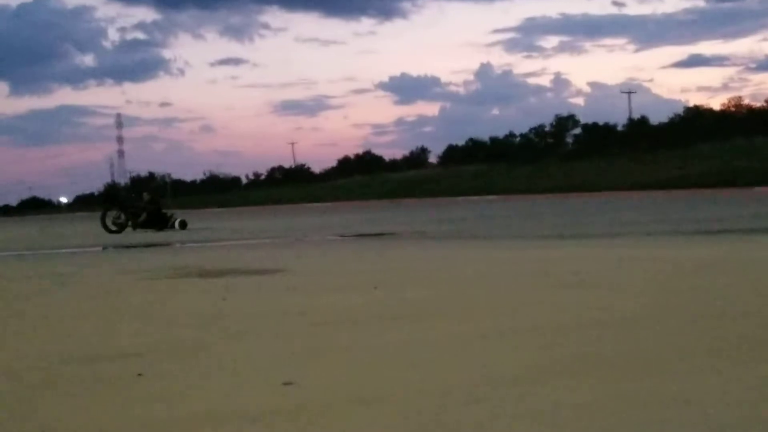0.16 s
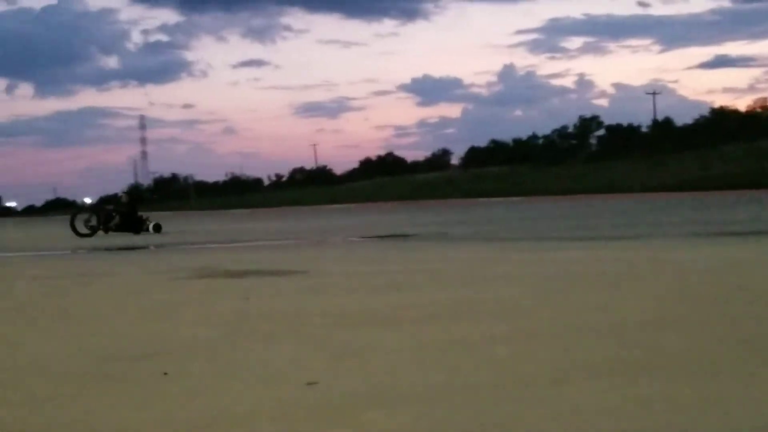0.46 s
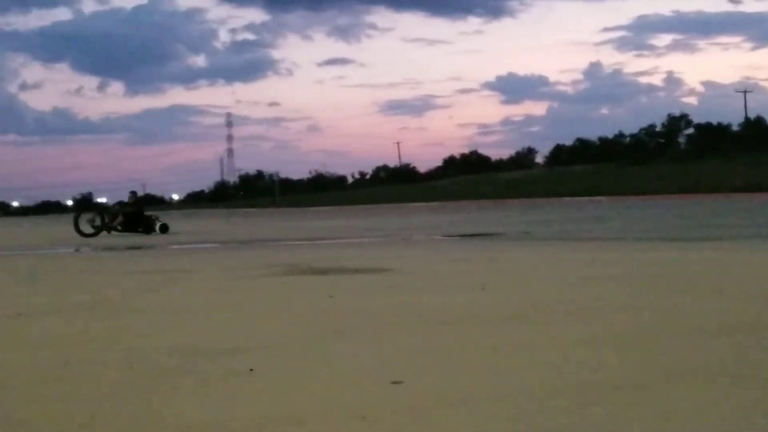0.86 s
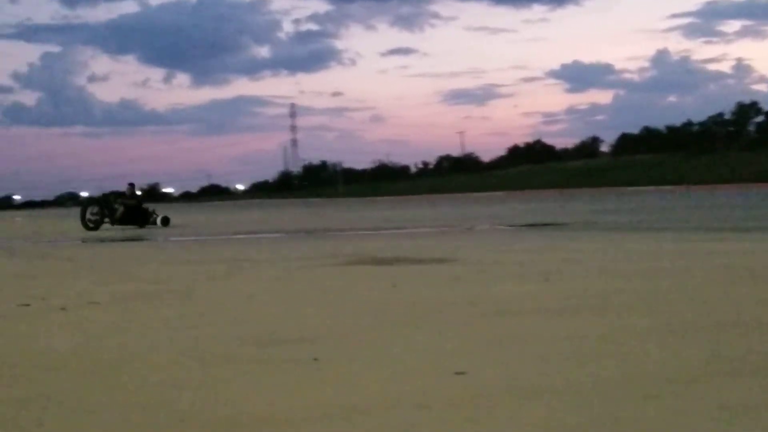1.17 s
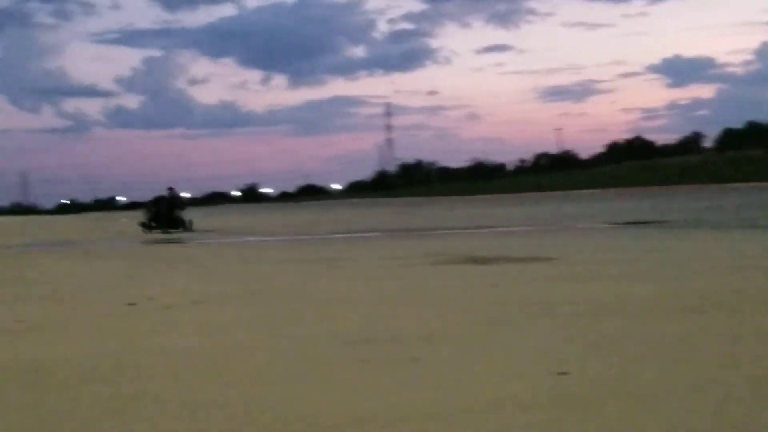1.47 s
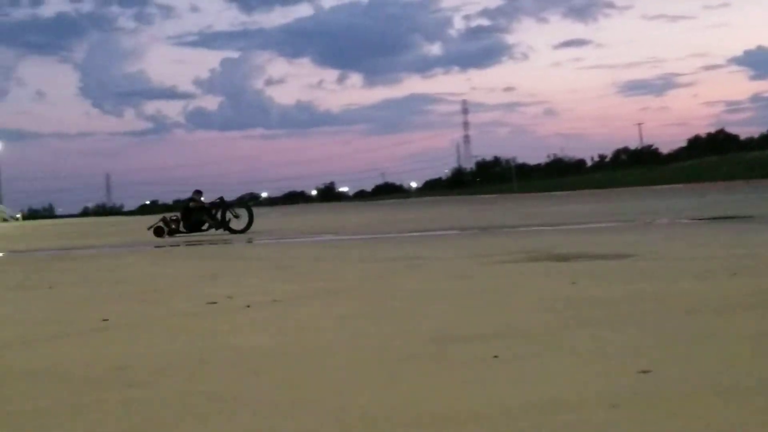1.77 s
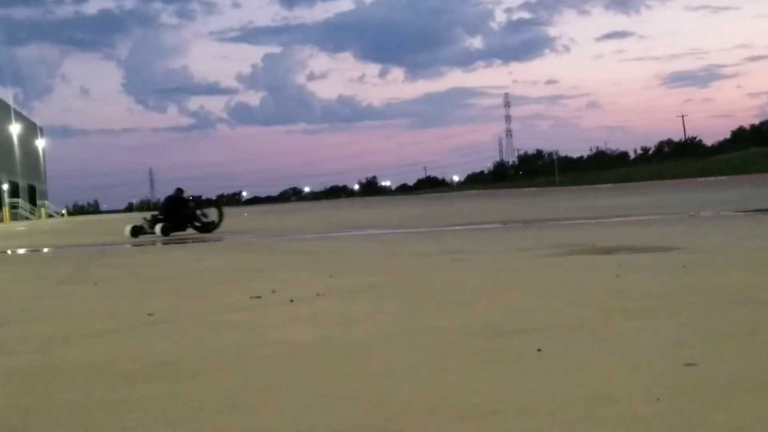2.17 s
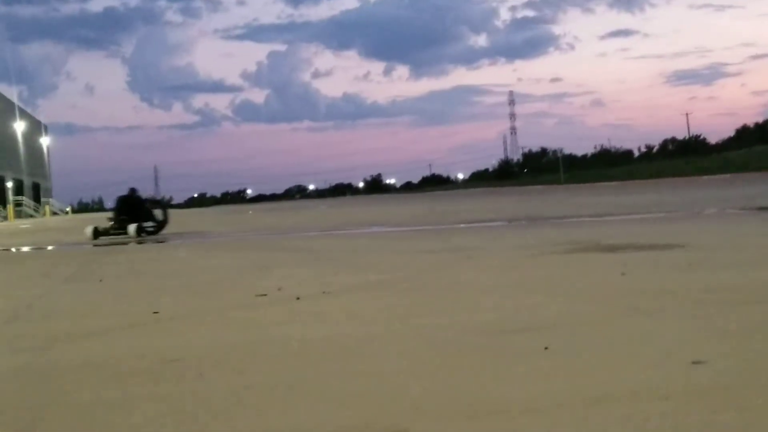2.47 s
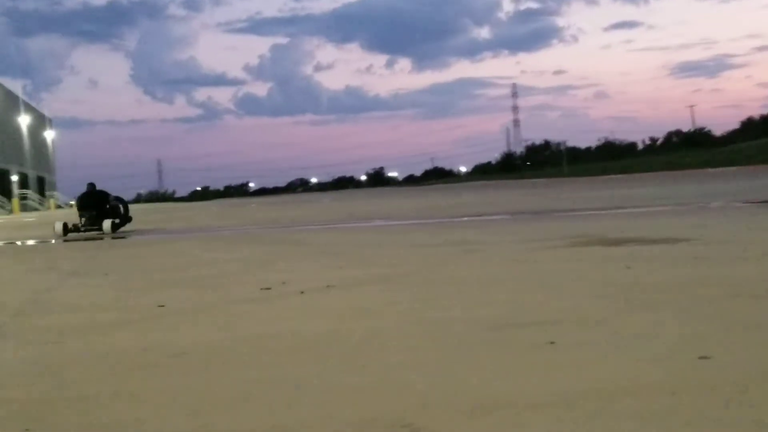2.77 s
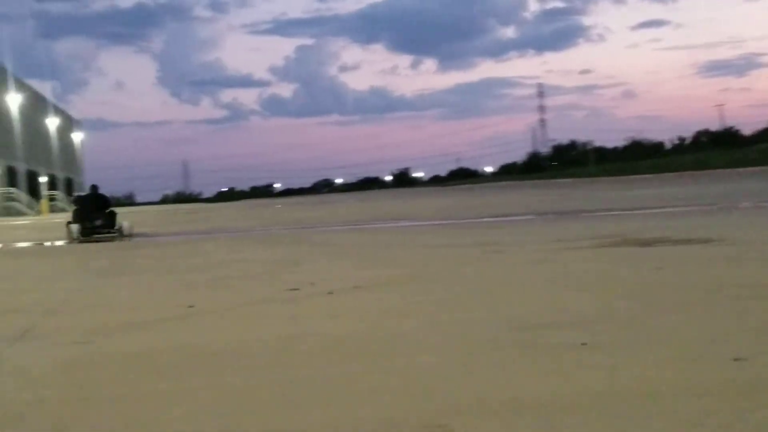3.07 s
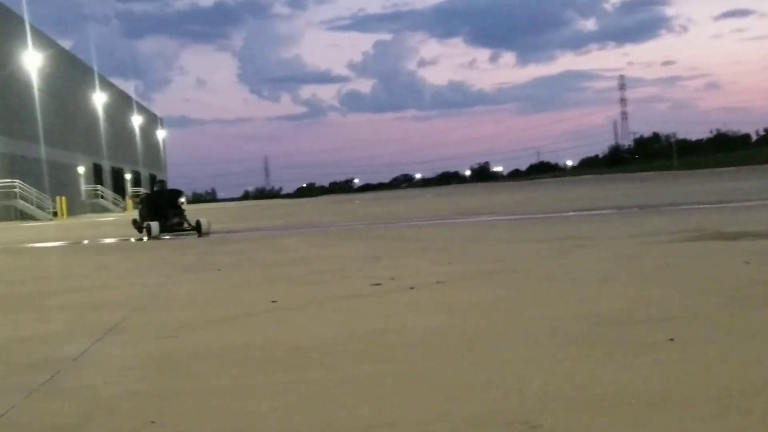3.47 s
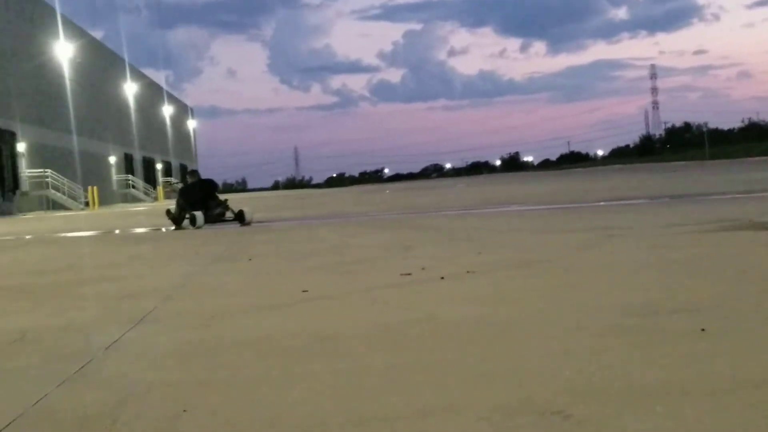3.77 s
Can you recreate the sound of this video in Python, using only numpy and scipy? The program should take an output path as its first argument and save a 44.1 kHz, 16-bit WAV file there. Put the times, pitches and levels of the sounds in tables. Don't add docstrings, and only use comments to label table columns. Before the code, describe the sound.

A small single-cylinder trike engine pulses loudly with sharp double cracks, then its plastic wheels slide with hiss and hollow drumming before it drops to a quiet ticking idle; open concrete lot, faint echo, distant stereo microphone.

```python
import sys
import numpy as np
from scipy import signal
from scipy.fft import rfft, irfft, next_fast_len
from scipy.io import wavfile
from scipy.ndimage import uniform_filter1d

SR = 44100
rng = np.random.default_rng(int(sys.argv[2]) if len(sys.argv) > 2 else 0)


def convert_level_to_amplitude(level_db):
    exponent = np.asarray(level_db, float) / 20
    return 10 ** exponent


def wav_out(sig):
    wavfile.write(sys.argv[1], SR, np.round(np.clip(np.atleast_2d(sig).T, -1, 1) * 32767).astype(np.int16))


N = 172431

# (time [s], effort [dB], silencer can heard [dB],
# outlet aimed at us [dB], valve side aimed at us [dB])
ENGINE = [(0, -16, 1.5, -12.5, -23), (.4, -15.5, -1.5, -12.5, -32), (.65, -16, -2.5, -12, -27),
          (.95, -11.5, -6.5, -16.5, -34), (1.3, -12, -7, -19.5, -12), (1.38, -15, -13, -14, -12),
          (1.45, -12.5, -6, -23, -42), (1.7, -10.5, -9, -21.5, -12), (1.84, -8.5, -6.5, -22, -8),
          (1.92, -21.5, -2.5, -15.5, -8), (2.3, -26, -2.5, -40, -28), (2.55, -20.5, -8, -39, -22),
          (2.86, -19.5, -13, -37, -25), (2.95, -14.5, -16, -36, -15), (3.25, -18.5, -8, -39, -18.5),
          (3.47, -13, -13.5, -33, -12), (3.91, -16.5, -8.5, -37, -8)]
# (time [s], pitch [Hz], heard [dB])
NOTE = [(0, 261, -2), (.1, 261, -2), (.2, 239, 0), (.62, 238, -4), (.82, 234, 0), (.92, 250, -2),
        (1.15, 244, -3), (1.3, 243, 3), (1.365, 246, -10), (1.415, 251, 4), (1.5, 249, -2), (1.56, 240, 0),
        (1.72, 240, 0), (1.83, 268, -4), (2.05, 245, -4), (2.3, 234, -3), (3.2, 240, -1.5), (3.91, 238, 0)]
# (time [s], level [dB])
SKID = [(0, -43.5), (.77, -37.5), (1.28, -35.5), (1.45, -31), (1.61, -29), (1.75, -31), (1.9, -36),
        (2.11, -39), (2.2, -44.5), (2.74, -48), (2.97, -49.5), (3.1, -43), (3.18, -45.5), (3.3, -46),
        (3.64, -53.5), (3.91, -44.5)]


def unit(x):
    return x / np.sqrt(np.mean(x ** 2) + 1e-20)


def along(points, hz):
    f, v = np.transpose(points)
    return np.interp(np.log(hz + 1), np.log(f + 1), v)


def at(rows, s):
    t, *cols = np.transpose(rows)
    return [np.interp(s, t, c) for c in cols]


def filtered(x, response):
    m = next_fast_len(N + SR // 2)
    return irfft(rfft(x, m) * response(np.fft.rfftfreq(m, 1 / SR)), m)[..., :N]


def rush(spectrum, patchy_db):
    # (frequency [Hz], likeness [-1 to 1])
    likeness = [(30, .3), (70, 0.79), (150, .99), (500, 0.35), (1000, 0.45), (4000, 0.62), (12000, 0.42)]
    z = signal.stft(rng.standard_normal((2, N)), nperseg=256)[2]
    patches = uniform_filter1d(rng.standard_normal(z.shape[1:]), size=4, axis=0)
    patches = unit(uniform_filter1d(patches, size=5, axis=1))
    pair = signal.istft(z * convert_level_to_amplitude(patchy_db * patches), nperseg=256)[1]
    pair = np.pad(pair, ((0, 0), (0, 256)))[:, :N]

    def response(hz):
        colour = convert_level_to_amplitude(along(spectrum, hz)) * np.minimum(1, hz / spectrum[0][0]) ** 2
        angle = np.arccos(np.clip(along(likeness, hz), -1, 1)) / 2
        return colour * [np.cos(angle), np.sin(angle)]

    mid, side = filtered(pair, response)
    return unit(np.array([mid + side, mid - side]))


def bursts(s, db, rise, t60, hz=None, glide=0):
    first = np.floor(s * SR).astype(int)[:, None] + np.arange(SR // 8)
    t = np.maximum(first / SR - s[:, None], 0)
    shape = convert_level_to_amplitude(db[:, None] - 60 * t / t60) * (1 - np.exp(-t / rise)) ** 2
    if hz is not None:
        shape = shape * np.sin(2 * np.pi * t * (hz[:, None] + glide * t / 2))
    ok = (first >= 0) & (first < N)
    return np.bincount(first[ok], shape[ok], N)


def crank(turn=0):
    # (time [s], firings so far)
    progress = [(.0167, 0), (.7148, 15), (1.0003, 21), (1.1, 23), (1.3139, 27), (1.464, 30), (1.6117, 33),
                (1.79, 37), (1.886, 39), (2.032, 41), (2.2, 43), (2.52, 46), (2.699, 48), (2.935, 51),
                (3.086, 53), (3.252, 55), (3.4035, 57), (3.621, 60), (3.899, 64)]
    s, count = np.transpose(progress)
    s = np.r_[s[0] - .0465, s, s[-1] + .07]
    return np.interp(np.arange(-1, count[-1] + 2) + turn, np.r_[-1, count, count[-1] + 1], s)


def firing_strength():
    s = crank()
    return at(ENGINE, s)[0] + .8 * rng.standard_normal(len(s))


def silencer(strength):
    # (frequency [Hz], level [dB], start after firing [s], rise [s], t60 [s])
    can_modes = [(121.9, 4.5, -.02, 0.0081, 0.14), (147, 6.5, -.016, 0.012, 0.19),
                 (172.5, 6.5, -.014, 0.01, 0.15)]
    outlet_modes = [(282.6, 3, -.005, 0.0033, 0.11), (324.5, 5, -.003, 0.0033, 0.09),
                    (380, -2, -.003, 0.003, 0.06), (443, 4.5, -.002, 0.0019, 0.064),
                    (502.5, 7, -.002, 0.0021, 0.062), (588, -1, -.002, 0.00085, 0.077),
                    (704, 6.5, -.001, 0.00097, 0.041), (851, 4, -.001, 0.0017, 0.026),
                    (1090, 2, -.001, 0.00047, 0.028)]
    s = crank()
    _, can, aim, _ = at(ENGINE, s)
    jitter = .00012 * rng.standard_normal(len(s))
    out = np.zeros(N)
    for modes, heard in [(can_modes, can), (outlet_modes, .79 * aim + 2)]:
        for hz, db, lag, rise, t60 in modes:
            level_chance, pitch_chance = rng.standard_normal((2, len(s)))
            level = strength + heard + db + .9 * level_chance
            out += bursts(s + lag + jitter, level, rise, t60, hz * (1 + .006 * pitch_chance))
    return out


def pipe(strength):
    s = crank()
    note, heard = at(NOTE, s)
    return bursts(s - .011, strength + heard + 5.5, rise=.008, t60=.19, hz=note)


def blow_down(strength):
    s = crank()
    aim = at(ENGINE, s)[2]
    level = strength + 18 - .5 * (aim + 35)
    return bursts(s - .0281, level, rise=.023, t60=.077, hz=118.8 + 0 * s, glide=2947)


def intake(strength):
    s = crank()
    aim = at(ENGINE, s)[2]
    note, heard = at(NOTE, s)
    level = strength + heard + 19 - .3 * (aim + 35)
    return bursts(crank(-.55), level, rise=.022, t60=.053, hz=note * 239 / NOTE[-1][1])


def valve_chest(strength):
    # (crank position [cycles], frequency [Hz], level [dB], rise [s], t60 [s])
    puffs = [
        (-.3, 620, -10, 0.003, 0.037),
        (-.06, 620, -7, 0.004, 0.04),
        (-.08, 490, -9, 0.006, 0.051),
    ]
    s = crank()
    _, _, aim, valve = at(ENGINE, s)
    heard = strength - .5 * (aim + 35) + .3 * (valve + 25)
    out = np.zeros(N)
    for turn, hz, db, rise, t60 in puffs:
        level_chance, pitch_chance = rng.standard_normal((2, len(s)))
        pitch = hz * (1 + .035 * pitch_chance)
        out += bursts(crank(turn), heard + db + 1.5 * level_chance, rise, t60, pitch)
    return out


def outlet_cracks():
    # (time [s], first crack [dB], second crack over it [dB])
    bangs = [(0.0164, -14, 0), (0.0618, -14, 0), (0.1077, -13, 0), (0.155, -13, 0), (0.2019, -15, 0),
             (0.2488, -9, 0), (0.2947, -13, 0), (0.3416, -11, 0), (0.3885, -10, 0), (0.4344, -13, 0),
             (0.4808, -13, 0), (0.5272, -12, 0), (0.5731, -15, 0), (0.62, -14, 0), (0.6669, -10, 0),
             (0.7143, -14, 0), (0.7612, -15, 0), (0.8076, -14, 0), (0.855, -15, 0), (0.9118, -10, 0),
             (0.9502, -12, 0), (1.0001, -11, 0), (1.049, -11, 0), (1.0989, -15, 0), (1.1513, -12, 0),
             (1.2052, -18, 0), (1.26, -14, 0), (1.3124, -12, 0), (1.3643, -10, 0), (1.4142, -10, 0)]
    # (delay after firing [s], level [dB], t60 [s])
    pair = [
        (-.002, 15, 0.033),
        (.0098, 14, 0.032),
    ]
    # (frequency [Hz], level [dB per Hz])
    colour = [(600, -12), (900, -8), (2600, -1), (4100, -0.5), (6000, -1), (7400, -4), (8800, -20.5),
              (16000, -19)]
    s = crank()
    effort, _, aim, _ = at(ENGINE, s)
    first, second = at(bangs, s)
    level = np.where(s < 1.44, first - 16, effort + aim)
    gate = sum(bursts(s + lag, level + db + k * second, .0011, t60)
               for k, (lag, db, t60) in enumerate(pair))
    return gate * rush(colour, patchy_db=4)


def valve_ticks():
    # (time [s], peak level [dB])
    taps = [(1.6501, -12), (1.695, -14), (1.735, -13), (1.7799, -11), (1.8277, -8), (1.8741, -12),
            (2.1001, -22), (2.5002, -26), (2.7581, -28), (2.8434, -32), (2.9138, -25), (2.9886, -24),
            (3.0654, -22), (3.1457, -24), (3.2281, -30), (3.3064, -24), (3.3817, -27), (3.4531, -24),
            (3.5244, -30), (3.5972, -29), (3.7938, -31), (3.8144, -28), (3.8784, -27)]
    # (delay after tap [s], level [dB], t60 [s])
    pair = [
        (0, -2, 0.028),
        (.0075, -9, 0.04),
    ]
    # (frequency [Hz], level [dB per Hz])
    colour = [(1500, -26), (2200, -6), (4000, 4.5), (7000, 4.5), (8500, -7), (12000, -7), (16000, -10)]
    s, level = np.transpose(taps)
    gate = sum(bursts(s + lag - .0005, level + db, .0005, t60) for lag, db, t60 in pair)
    return gate * rush(colour, patchy_db=3)


def treble_rush():
    # (time [s], level [dB])
    rush_level = [(0.0, -40), (0.6, -39), (1.28, -40), (1.44, -46), (1.63, -46), (1.76, -45), (2.54, -53),
                  (2.85, -54), (3.43, -54), (3.66, -50), (3.91, -49)]
    # (frequency [Hz], level [dB per Hz])
    colour = [(2000, -3), (5000, -8), (7400, 1), (8800, -4), (10500, -2), (11500, 2), (13200, -2),
              (15000, -1)]
    return convert_level_to_amplitude(4 + at(rush_level, np.arange(N) / SR)[0]) * rush(colour, patchy_db=3)


def sliding_hiss():
    # (frequency [Hz], level [dB per Hz])
    colour = [(590, -25), (1000, -17.5), (2390, -2.5), (3620, -1), (4620, 6.5), (6860, 0.5), (8450, -28.5),
              (16000, -32)]
    return convert_level_to_amplitude(5 + at(SKID, np.arange(N) / SR)[0]) * rush(colour, patchy_db=1)


def hollow_drumming():
    # (time [s], level [dB])
    drumming = [(0, -53), (1.55, -44), (1.68, -30), (1.75, -29.5), (1.9, -30.5), (1.97, -44), (2.17, -48.5),
                (2.25, -37), (2.39, -46), (2.45, -55), (3.91, -50)]
    # (frequency [Hz], level [dB per Hz])
    colour = [(340, -6), (440, 2), (520, 2), (590, -6), (680, 6), (800, -22), (2000, -13), (4000, -43)]
    return convert_level_to_amplitude(at(drumming, np.arange(N) / SR)[0]) * rush(colour, patchy_db=5.5)


def pebble():
    # (time [s], peak level [dB])
    snaps = [
        (2.612, -14),
    ]
    click = np.zeros(N)
    for s, db in snaps:
        click[round(s * SR)] = convert_level_to_amplitude(db + 21)

    def response(hz):
        resonance = 1j * hz * 1400 / (650 ** 2 - hz * hz + 1j * hz * 1400)
        return resonance / (1 + 1j * hz / 5000)

    return filtered(click, response)


def rolling_rumble():
    # (frequency [Hz], level [dB per Hz])
    colour = [(30, -1), (55, 0), (120, -2.5), (300, -12), (900, -13), (2000, -16.5), (5000, -27),
              (8500, -36), (16000, -38)]
    slide = at(SKID, np.arange(N) / SR)[0]
    return convert_level_to_amplitude(-36.5 + .14 * (slide - slide.min())) * rush(colour, patchy_db=1)


def lot(x):
    # (frequency [Hz], t60 [s])
    decay = [(100, 1), (1000, 1), (8000, 0.37)]
    hz, t, z = signal.stft(rng.standard_normal((2, SR // 2)), SR, nperseg=256)
    tail = signal.istft(z * convert_level_to_amplitude(-60 * t / along(decay, hz)[:, None]), SR, nperseg=256)[1]
    return signal.fftconvolve(x, tail / np.linalg.norm(tail[0]), axes=1)[:, :N]


def scene():
    strength = firing_strength()
    tones = silencer(strength) + pipe(strength) + blow_down(strength)
    tones = tones + intake(strength) + valve_chest(strength)
    trike = tones + outlet_cracks() + valve_ticks() + treble_rush()
    wheels = sliding_hiss() + hollow_drumming() + pebble() + rolling_rumble()
    return trike + convert_level_to_amplitude(-17) * lot(trike) + wheels


def top_cut(x):
    return signal.sosfilt(signal.butter(12, 17020, fs=SR, output="sos"), x)


def record(dry):
    # (frequency [Hz], left over right [dB])
    lean = [(60, 2), (180, 1.0), (550, 0.5), (1650, 1), (4970, -2), (15000, 9)]
    side = np.array([[1], [-1]])
    lag_s, low_cut_hz, top_hz = .00008, 78, 15900

    def ports(hz):
        colour = convert_level_to_amplitude(side * along(lean, hz) / 2)
        delay = np.exp(1j * np.pi * side * hz * lag_s)
        return colour * delay * (hz < top_hz) / np.sqrt(1 + (low_cut_hz / (hz + 1)) ** 4)

    return top_cut(filtered(dry, ports))


dry = scene()
out = record(dry)
wav_out(out)
```